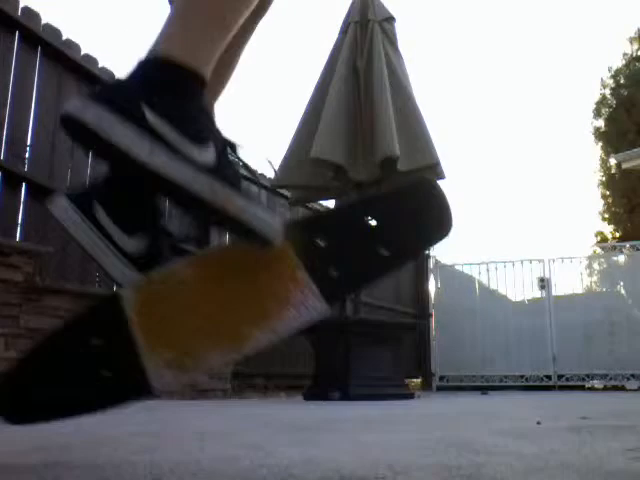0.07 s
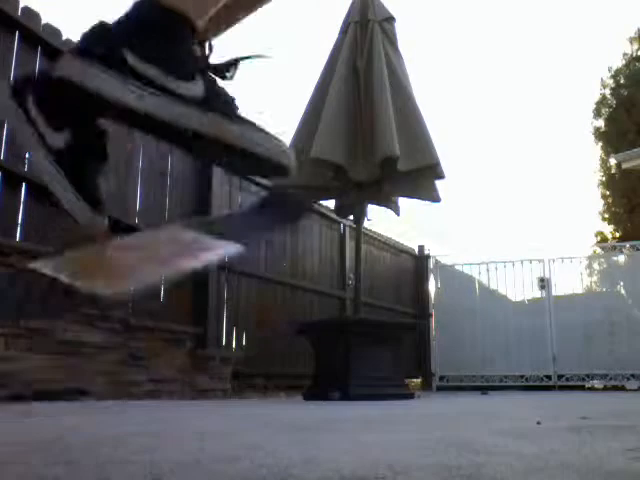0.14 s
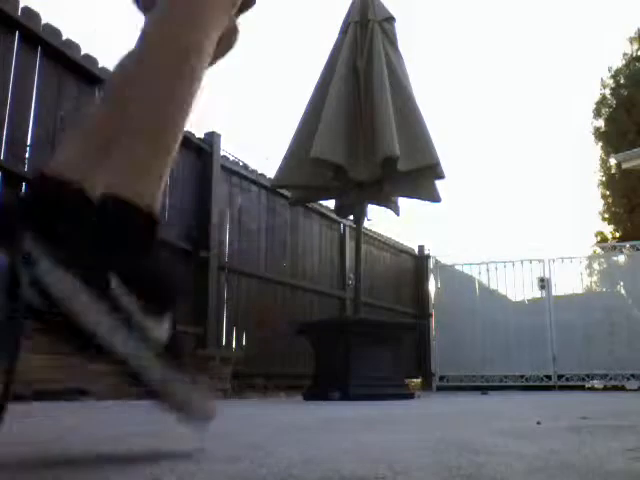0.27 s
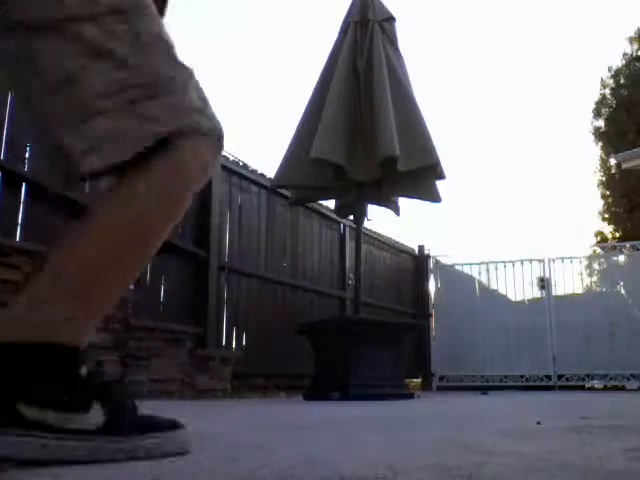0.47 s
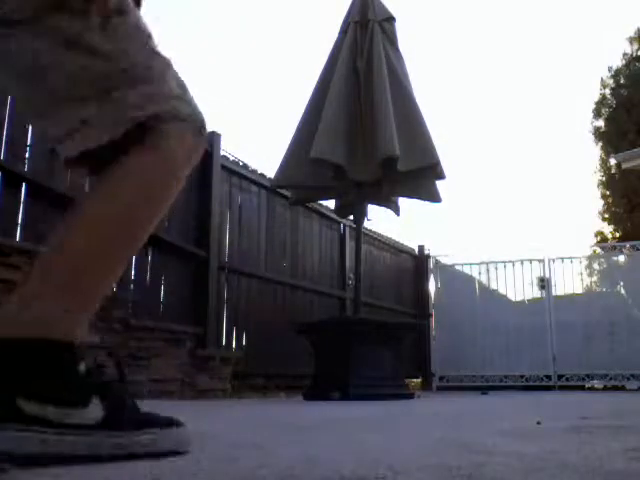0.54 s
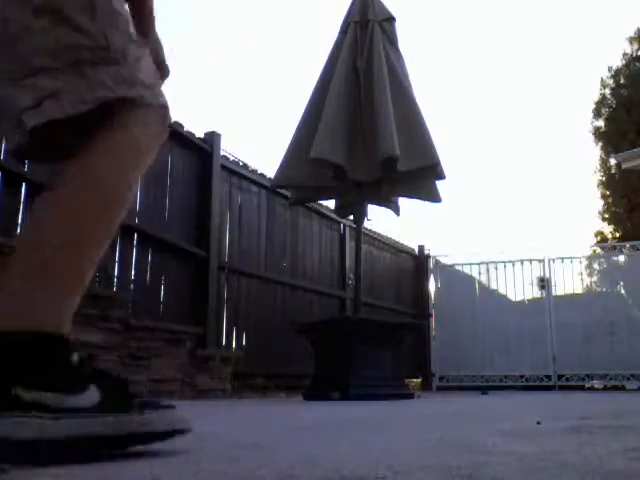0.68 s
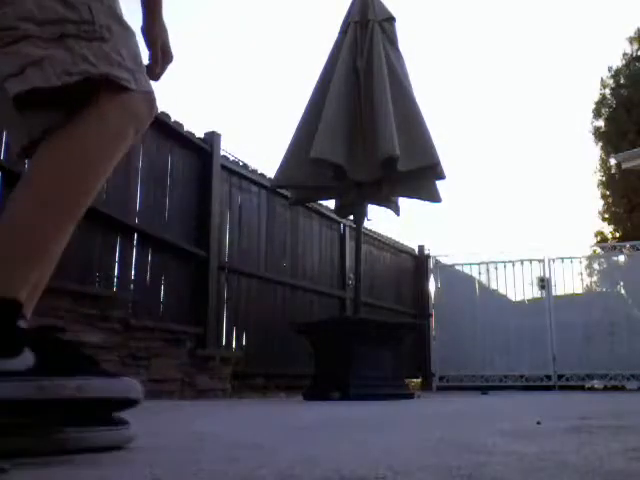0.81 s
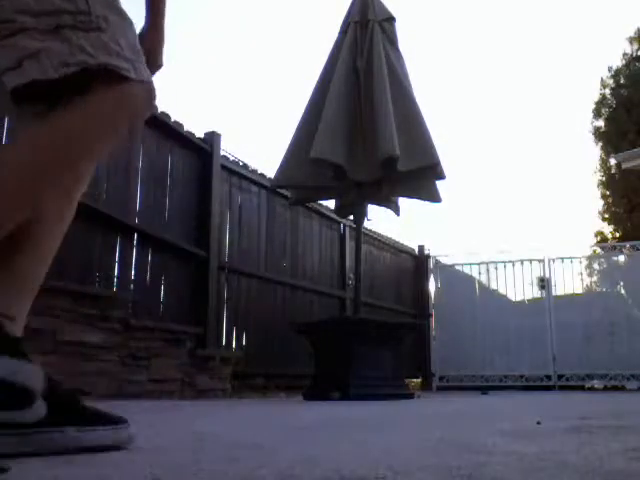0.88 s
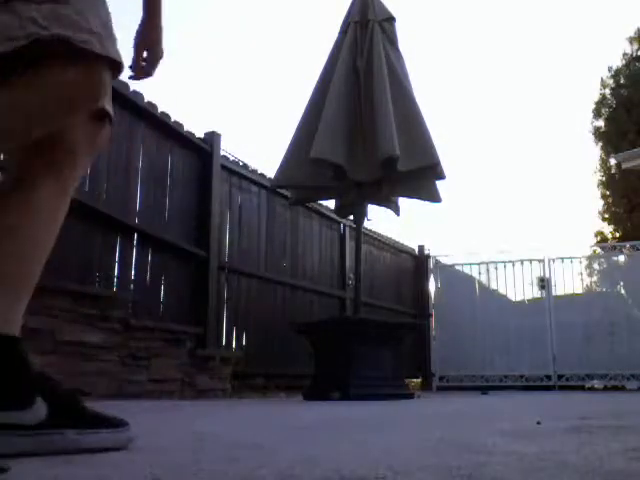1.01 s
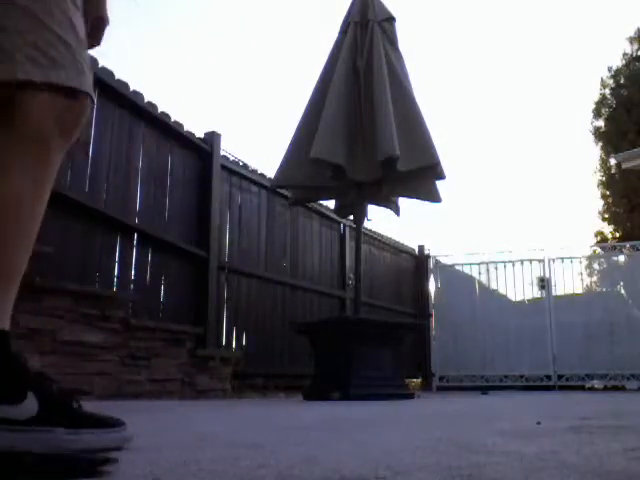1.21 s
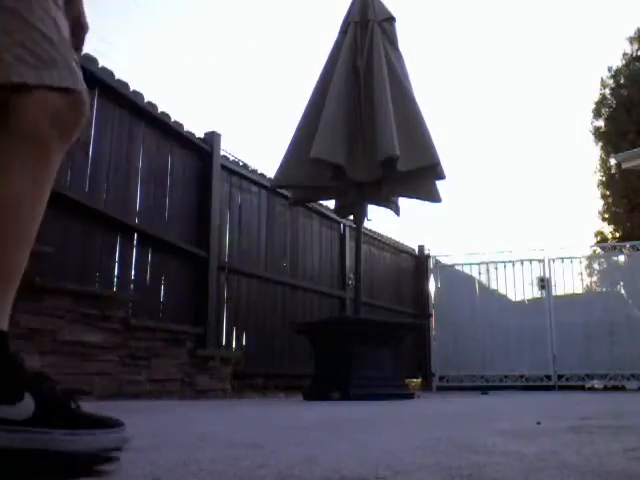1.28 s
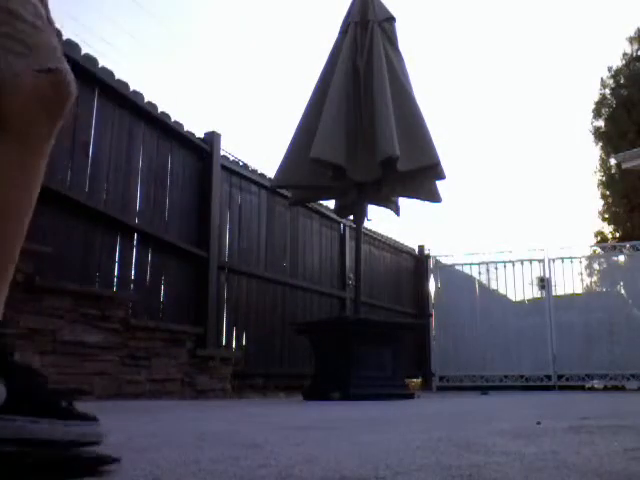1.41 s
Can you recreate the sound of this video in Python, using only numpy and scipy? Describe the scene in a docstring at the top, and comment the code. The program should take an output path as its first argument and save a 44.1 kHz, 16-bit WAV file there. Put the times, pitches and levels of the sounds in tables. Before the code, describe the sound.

Close by on an outdoor patio, a skateboard pops and clatters down on concrete in a quick run of wooden knocks and bright clacks with a short echo. Quiet air follows, then a faint, gritty shoe scuff.

```python
"""Skateboard tumble on a patio

Close by, a skateboard scrapes, pops, tumbles and clacks down on concrete. Each blow is a low thud,
a buzzing wooden knock and a bright clack that rings the axles; the fenced yard throws it back.
Then quiet outdoor air, a faint rustle and a shoe scuffing over grit."""
import sys
import numpy as np
from scipy import signal
from scipy.fft import rfft, irfft
from scipy.io import wavfile

SR = 44100
rng = np.random.default_rng(int(sys.argv[2]) if len(sys.argv) > 2 else 0)


def put_to_file(sound):
    """Save the sound as 16-bit audio at rate SR, in the file named by the first command-line argument."""
    columns = np.atleast_2d(sound).T  # one column per channel
    safe = np.clip(columns, -1, 1)
    whole_steps = np.round(safe * 32767)
    wavfile.write(sys.argv[1], SR, whole_steps.astype(np.int16))


N = 63945
TIME = np.arange(N) / SR


def amp(db):
    """Decibels to gain."""
    return 10 ** (np.asarray(db) / 20)


def unit_rms(x):
    """Sets a signal to an rms of 1."""
    return x / np.sqrt(np.mean(x ** 2) + 1e-20)


def curve_at(points, hz):
    """Reads a curve along a log-frequency axis."""
    freqs, values = np.transpose(points)
    return np.interp(np.log(hz + 1), np.log(freqs + 1), values)


def coloured(x, tone):
    """Shapes x with an EQ curve, at rms 1."""
    hz = np.fft.rfftfreq(len(x), 1 / SR)
    return unit_rms(irfft(rfft(x) * amp(curve_at(tone, hz)), len(x)))


def banded(noise, hz, q):
    """Noise sent twice through one broad resonance, at rms 1."""
    peak = signal.iirpeak(hz, q, fs=SR)
    return unit_rms(signal.lfilter(*peak, signal.lfilter(*peak, noise)))


def swing(t, db, hz, decay_s):
    """A quickly damped sine."""
    return -amp(db) * np.sin(2 * np.pi * hz * t) * np.exp(-t / decay_s)


def add(mix, start_s, sound):
    """Drops a sound into the mix."""
    part = mix[round(start_s * SR):][:len(sound)]
    part += sound[:len(part)]


# The air's bass-heavy colour. Each row: frequency in Hz, relative level in dB.
AIR_TONE = [(15, -56.5), (25, -24.5), (75, -0.5), (193, -11), (267, -15), (349, -18), (378, -22),
            (782, -16.5), (3440, -35.5), (13900, -39.5), (15500, -54)]


def outdoor_air():
    """A faint, steady bed of low noise."""
    return amp(-61.5) * coloured(rng.standard_normal(N), AIR_TONE)


# How long the yard rings. Each row: frequency in Hz, seconds to fall 60 dB.
YARD_DECAY = [(100, 0.04), (300, 0.44), (1000, 0.37), (2500, 0.44), (5000, .27), (8000, 0.29)]
# The yard's colour. Each row: frequency in Hz, relative level in dB.
YARD_TONE = [(100, -7.5), (400, -4.5), (1200, -2.5), (3000, -10.5), (6000, -2.5), (9000, -0.5)]


def yard_echo(x, wet_db=-9.5, build_s=0.01, fence_s=0.056, spread_s=0.007, fence_db=7):
    """A diffuse tail dies band by band and swells as the fences answer."""
    hz, frame_s, spectrum = signal.stft(rng.standard_normal(SR), SR, nperseg=256)
    fade_db = 60 * frame_s / curve_at(YARD_DECAY, hz)[:, None]
    spectrum *= amp(curve_at(YARD_TONE, hz)[:, None] - fade_db)
    tail = signal.istft(spectrum, SR, nperseg=256)[1]
    t = np.arange(len(tail)) / SR
    fence_swell = amp(fence_db * np.exp(-((t - fence_s) / spread_s) ** 2))
    tail *= np.minimum(t / build_s, 1) * fence_swell
    return amp(wet_db) * signal.fftconvolve(x, tail / np.linalg.norm(tail))[:N]


# The low end of rubbing on concrete. Each row: frequency in Hz, relative level in dB.
RUMBLE_TONE = [(18, -33), (30, -14), (145, -1.5), (180, -4.5), (219, -7.5), (351, -9), (500, -12),
               (650, -34), (1100, -120)]


def friction(moves, tone, grains_per_s=14000, spread_db=2):
    """Rubbing on concrete: dense grains of grit over a rumble, each riding its own fader."""
    times, grit_db, rumble_db = np.transpose(moves)[:3]
    grains = rng.standard_normal(N) * amp(spread_db * np.minimum(rng.exponential(1, N), 4))
    grains *= rng.random(N) < grains_per_s / SR
    grit = amp(np.interp(TIME, times, grit_db)) * coloured(grains, tone)
    rumble = amp(np.interp(TIME, times, rumble_db)) * coloured(rng.standard_normal(N), RUMBLE_TONE)
    return grit + rumble


# The shoe's fader moves. Each row: time in seconds, scuff level in dB, rumble level in dB.
SCUFF_MOVES = [(.76, -85, -90.5), (.83, -65, -87), (.87, -66.5, -95), (.91, -56, -95), (.94, -72.5, -87),
               (1.0, -92, -85), (1.215, -79.5, -87.5), (1.225, -56.5, -66.5), (1.245, -47.5, -52),
               (1.275, -48, -58), (1.33, -40, -67.5), (1.35, -62, -50), (1.375, -53, -61.5),
               (1.39, -91, -66.5), (1.45, -56.5, -54.5)]
# The sole's colour. Each row: frequency in Hz, relative level in dB.
SCUFF_TONE = [(180, -34.5), (300, -6), (603, -12), (1020, -4.5), (1130, -6), (2110, -13), (5960, -13),
              (7920, -22.5), (9000, -57.5), (11700, -88), (19800, -120)]


def shoe_scuff():
    """A faint rustle, then a sole drags over the concrete."""
    return friction(SCUFF_MOVES, SCUFF_TONE)


# Grit underfoot. Each row: start in seconds, thud level in dB, pitch in Hz and decay in ms,
# knock level in dB and pitch in Hz, clack level in dB, pitch in Hz and decay in ms.
GRIT_HITS = [(1.2355, -56, 189, 4, -51, 980, -40.5, 3820, 3.7),
             (1.248, -36, 313, 3.4, -49, 870, -36, 4500, 2),
             (1.2507, -34, 226, 1.93, -27.5, 1000, -67, 1760, 1.2),
             (1.2606, -41, 119, 12.5, -40, 553, -34, 3410, 0.7),
             (1.272, -37.5, 258, 6.5, -43.5, 1290, -36, 4016, 4),
             (1.29, -37, 283, 5.7, -28.5, 1154, -41.5, 2780, 2.3),
             (1.313, -46, 250, 5.9, -42, 857, -38, 1680, 3),
             (1.318, -59, 269, 2.8, -43, 945, -34.5, 2070, 1.8),
             (1.331, -42, 276, 16.5, -46, 820, -39, 2210, 1.8),
             (1.3611, -52, 180.3, 1.6, -49, 1000, -33.5, 3900, 1.45),
             (1.373, -41.5, 160, 5.6, -30, 1410, -37.5, 4570, 1.2)]


def grit_crunch():
    """Grit crunches under the shoe in tiny impacts; returns body and clack."""
    return impacts(GRIT_HITS)


# The board's fader moves. Each row: time in seconds, then scrape, rumble and hiss levels in dB.
SCRAPE_MOVES = [(0, -46, -52, -65), (0.032, -34, -48, -61), (0.052, -30, -34, -59),
                (.068, -34.5, -49.5, -56), (0.085, -27, -38, -60), (0.102, -29, -28.5, -47.5),
                (0.158, -48.5, -39.5, -59.5), (.21, -48, -45, -66), (0.292, -54.5, -47.5, -62),
                (0.302, -51, -39, -52.5), (0.371, -58.5, -41.5, -62), (.385, -48, -44.5, -80.5),
                (.4, -31.5, -38.5, -86.5), (.43, -31.5, -43, -95.5), (.46, -44, -44.5, -95.5),
                (.52, -89, -50, -93), (.6, -85.5, -86.5, -109)]
# The scrape's colour. Each row: frequency in Hz, relative level in dB.
SCRAPE_TONE = [(180, -41.5), (300, -14.5), (404, -21), (848, -2.5), (1080, -16), (1320, -5.5), (2110, -9),
               (3830, -6.5), (9000, -11.5), (11700, -56), (19800, -120)]


def board_scrape():
    """The board grinds on the concrete around the pop and the tumble."""
    return friction(SCRAPE_MOVES, SCRAPE_TONE)


# The scrape's top end. Each row: frequency in Hz, relative level in dB.
HISS_TONE = [(4880, -34), (8300, 0.5), (9760, 0), (11500, -3.5), (14800, -13.5)]


def scrape_hiss():
    """A thin treble hiss rides over the scraping."""
    times, _, _, hiss_db = np.transpose(SCRAPE_MOVES)
    return amp(np.interp(TIME, times, hiss_db)) * coloured(rng.standard_normal(N), HISS_TONE)


# The axles' partials. Each row: pitch in Hz, relative level in dB, seconds to fall 60 dB.
AXLE_MODES = [(1284, -3, 0.28), (2163, 0.5, 0.19), (2380, 0, .3)]


def axle_ring(clack, send_db=-54):
    """The clacks set the metal axles ringing."""
    t = np.arange(SR // 2) / SR
    ring = sum(amp(db - 60 * t / t60) * np.sin(2 * np.pi * hz * t) for hz, db, t60 in AXLE_MODES)
    return amp(send_db) * signal.fftconvolve(clack, ring)[:N]


def impacts(hits, rise_s=0.00012, buzz_db=-8.5, buzz_s=0.0036, rattle_db=-22, rattle_stretch=6.7):
    """Each blow is a low thud, a buzzing knock and a bright clack; returns body and clack."""
    body, clack = np.zeros((2, N))
    t = np.arange(SR // 12) / SR
    attack = 1 - np.exp(-t / rise_s)
    wide_band = signal.butter(2, [1300, 6500], "band", fs=SR)
    for start, thud_db, thud_hz, thud_ms, knock_db, knock_hz, clack_db, clack_hz, clack_ms in hits:
        buzz_noise, clack_noise = rng.standard_normal((2, len(t)))
        thud = swing(t, thud_db, thud_hz, thud_ms / 1000)
        thud *= np.minimum(3 * t * thud_hz, 1)  # fades in over a third of a cycle
        knock = swing(t, knock_db, knock_hz, decay_s=0.83 / knock_hz)
        buzz = amp(knock_db + buzz_db) * banded(buzz_noise, knock_hz, q=1) * np.exp(-t / buzz_s)
        add(body, start, thud + attack * (knock + buzz))

        bright = banded(clack_noise, clack_hz, q=1 / 0.73)
        bright += amp(3) * signal.lfilter(*wide_band, clack_noise)
        fall = np.exp(-t * 1000 / clack_ms)
        bright *= np.linalg.norm(fall) / np.linalg.norm(bright * fall)  # same punch from any noise
        rattle = amp(rattle_db) * fall ** (1 / rattle_stretch)
        tick = swing(t, db=5.5, hz=clack_hz, decay_s=0.0005)  # a clean front edge
        add(clack, start, amp(clack_db) * (tick + attack * bright * (fall + rattle)))
    return body, clack


# The board's blows. Each row: start in seconds, thud level in dB, pitch in Hz and decay in ms,
# knock level in dB and pitch in Hz, clack level in dB, pitch in Hz and decay in ms.
BOARD_HITS = [(.0492, -40.5, 196, 4, -20, 750, -25.5, 3700, 3.8),
              (.0912, -15.5, 150, 3, -5, 1300, -10, 4400, 1.23),
              (.0918, -39, 232, 3, -16, 2300, -14.5, 2470, 0.41),
              (.094, -12, 292.5, 4, -13, 680, -15, 2270, 1.4),
              (.0975, -14, 202.1, 3.7, -14.5, 480, -21, 3310, 3),
              (.135, -34.5, 282, 4, -15, 820, -29, 2070, 0.84),
              (.147, -34, 130, 6, -23, 670, -38, 2830, 0.8),
              (.1765, -35, 122, 6, -26.5, 810, -37, 1730, 1.4),
              (.186, -41, 107, 6, -34, 860, -33, 2300, 1.7),
              (.2955, -25, 178, 5, -7.5, 480, -12, 4500, 0.81),
              (.2965, -42.5, 170, 5, -13.5, 1200, -39.5, 4490, 1.3),
              (.306, -24, 112, 6, -10, 1130, -37.5, 1610, 0.38),
              (.318, -34.5, 114, 6, -15, 650, -33.5, 3800, 6.9),
              (.3355, -22.5, 203, 5, -11.5, 580, -22, 2800, 1.8),
              (.347, -16.5, 250, 4, -16, 660, -41, 2100, 1.1),
              (.3525, -34.5, 186, 4, -9.5, 800, -28, 3500, 2.1),
              (.356, -21, 108, 5, -12.5, 650, -33, 1690, 1.1),
              (.3605, -25.5, 127.9, 5, -20, 610, -37, 2830, 0.93),
              (.3852, -23, 240, 4, -5.5, 1100, -7.5, 4840, 4.3),
              (.3858, -40.5, 240.3, 4, -17, 700, -6, 3000, 2.2),
              (.3935, -19.5, 238, 4, 1, 900, -14.5, 1730, 4.2),
              (.4035, -7.5, 222, 6, -7, 570, -15.5, 5000, 1.9),
              (.4075, -13.5, 270, 4, -2, 540, -14, 1900, 0.96),
              (.4205, -30, 180, 4, -23, 1020, -20.5, 4000, 1.3),
              (.431, -28, 232, 4, -13, 800, -13, 1690, 4.4),
              (.439, -29.5, 190, 5, -2.5, 530, -19.5, 3140, 1.5),
              (.4475, -17.5, 207, 5, -19.5, 540, -26.5, 2740, 1.5),
              (.4695, -22, 210, 2.5, -7, 450, 5, 3620, 0.71),
              (.4812, -33, 141.3, 4, -14.5, 1110, -6, 4000, 1.8),
              (.4918, -4, 100, 3.5, 5, 1500, 5.5, 4027, 1.3),
              (.4945, -10, 220, 4, -5, 1500, -12.5, 4176, 2),
              (.5008, -23.5, 196.4, 4, -19.5, 1060, -7.5, 4950, 0.81),
              (.5185, -26, 225.7, 4, -5.5, 1828, -6, 3880, 0.48),
              (.528, -44, 233, 4, -14.5, 910, -14, 2730, 2)]


def board_tumble():
    """The wooden deck pops, tumbles and lands on concrete; returns body and clack."""
    return impacts(BOARD_HITS)


def board_snaps(offset_db=-31, decay_s=0.0006):
    """The first instant of each board clack reaches the top treble."""
    snaps = np.zeros(N)
    t = np.arange(SR // 200) / SR
    for start, *_, clack_db, _, _ in BOARD_HITS:
        burst = rng.standard_normal(len(t)) * np.exp(-t / decay_s)
        add(snaps, start, amp(clack_db + offset_db) * burst)
    return signal.sosfilt(signal.butter(6, 8000, "high", fs=SR, output="sos"), snaps)


def scene(soften_hz=4170, stopband_hz=8640):
    """Board, shoe and yard, darkened, then topped with snaps, hiss and air; mono on both channels."""
    board_body, board_clack = board_tumble()
    grit_body, grit_clack = grit_crunch()
    clack = board_clack + grit_clack
    near = board_body + grit_body + clack + axle_ring(clack) + board_scrape() + shoe_scuff()
    softened = signal.lfilter(*signal.butter(1, soften_hz, fs=SR), near + yard_echo(near))
    dark = signal.sosfilt(signal.cheby2(14, 60, stopband_hz, fs=SR, output="sos"), softened)
    mono = dark + board_snaps() + scrape_hiss() + outdoor_air()
    return np.array([mono, mono])


def record(dry, low_cut_hz=40, ceiling_db=-1.4, high_cut_hz=15300):
    """Trims the sub-bass, flattens any peak over the ceiling and cuts the very top."""
    trimmed = signal.lfilter(*signal.butter(2, low_cut_hz, "high", fs=SR), dry)
    clipped = np.clip(trimmed, -amp(ceiling_db), amp(ceiling_db))
    high_cut = signal.firwin(255, high_cut_hz, window=("kaiser", 9), fs=SR)
    return signal.oaconvolve(clipped, high_cut[None], "same")


dry = scene()
out = record(dry)
put_to_file(out)
```